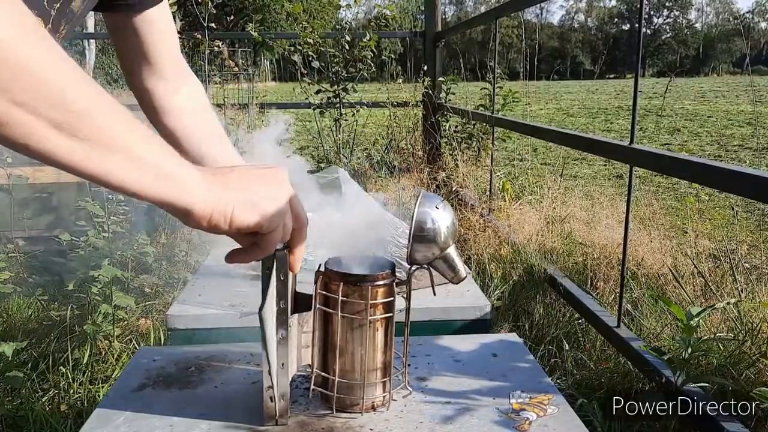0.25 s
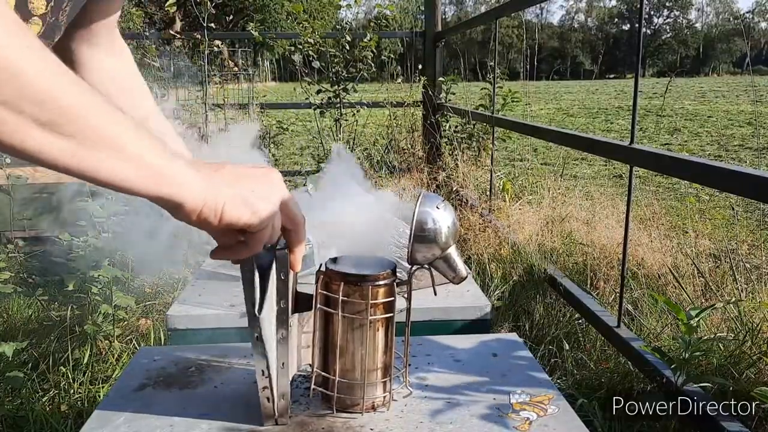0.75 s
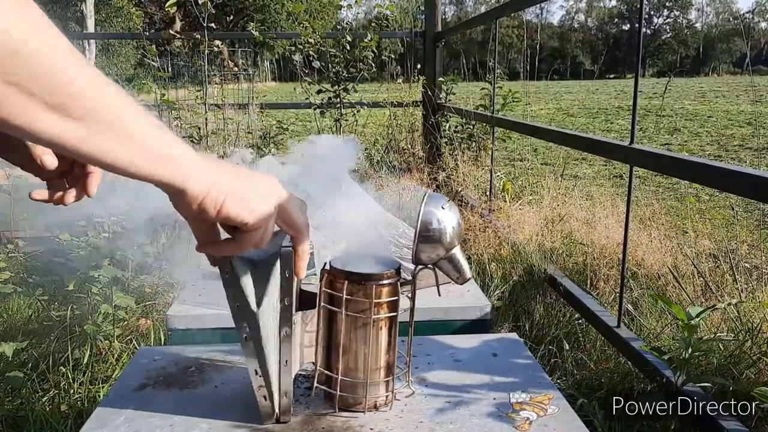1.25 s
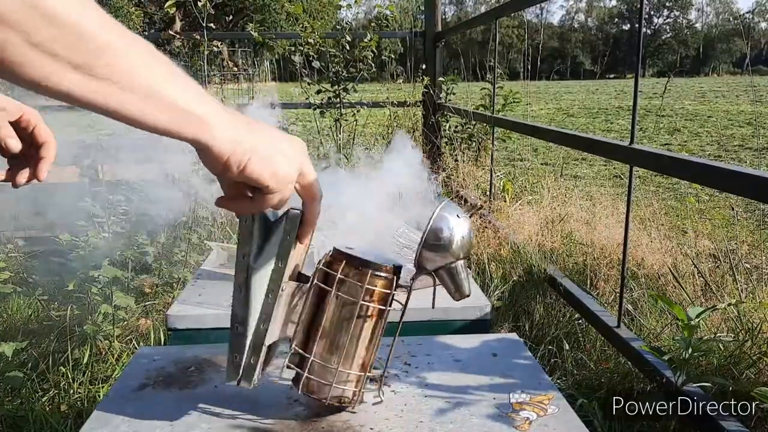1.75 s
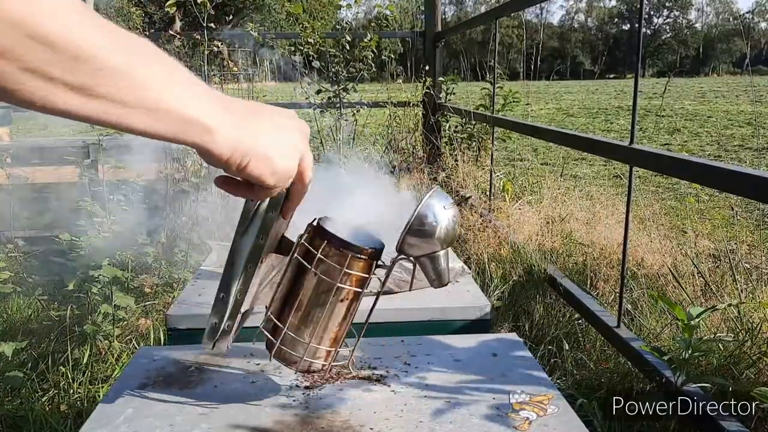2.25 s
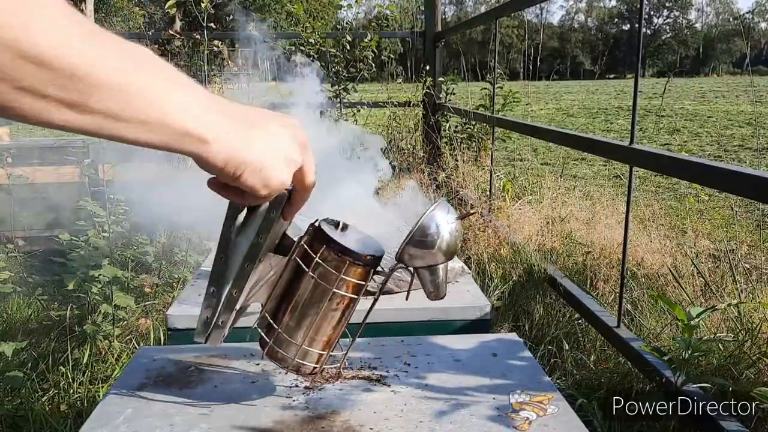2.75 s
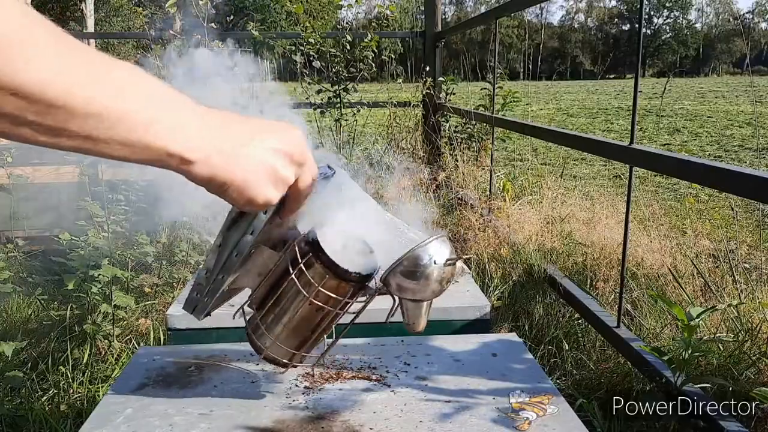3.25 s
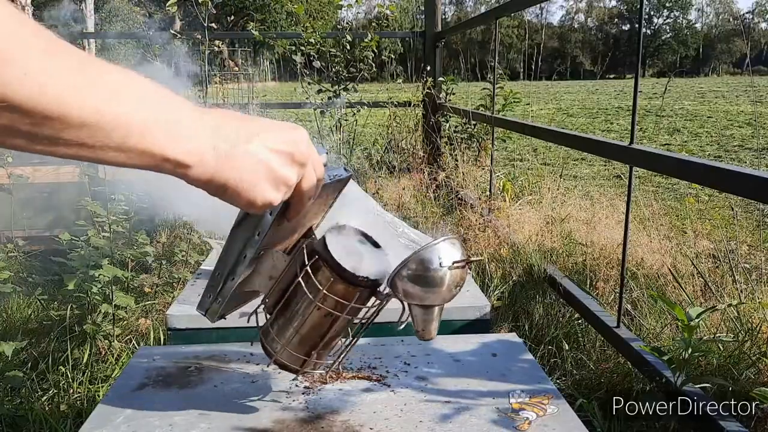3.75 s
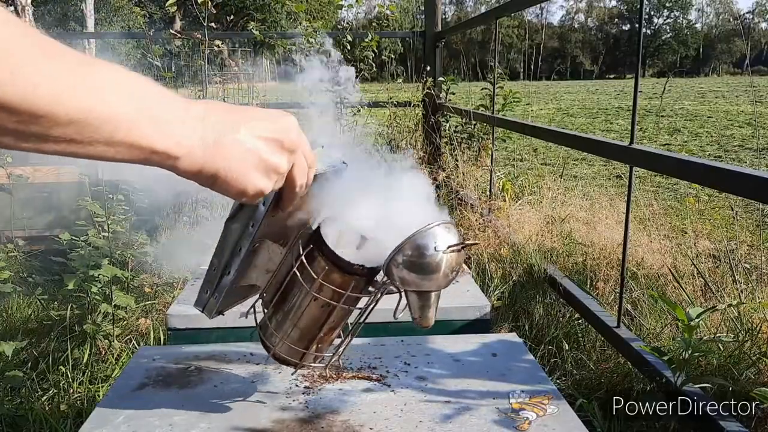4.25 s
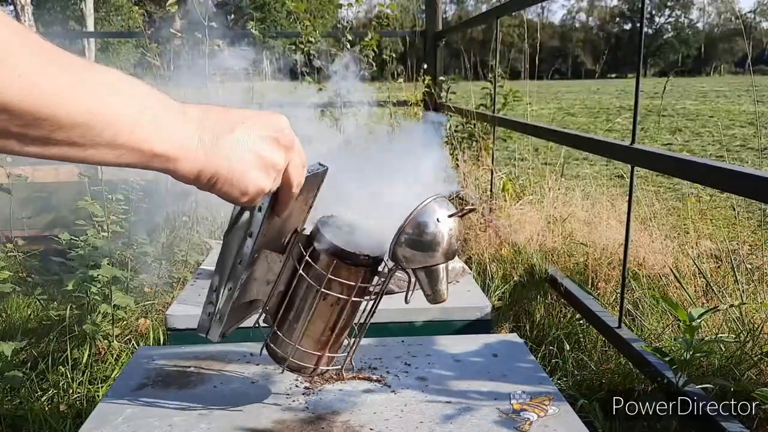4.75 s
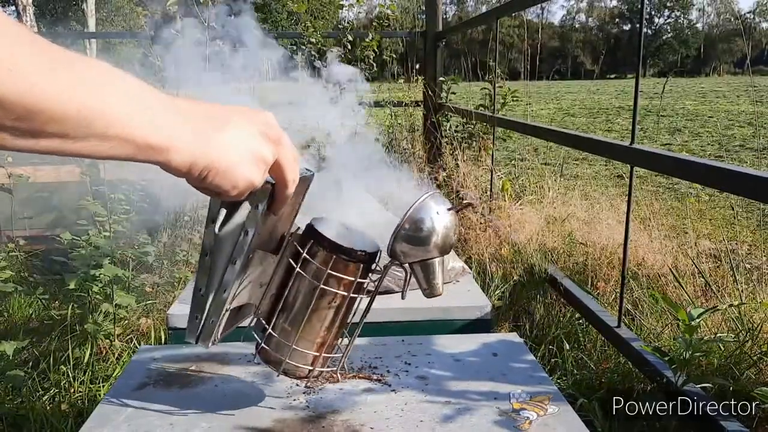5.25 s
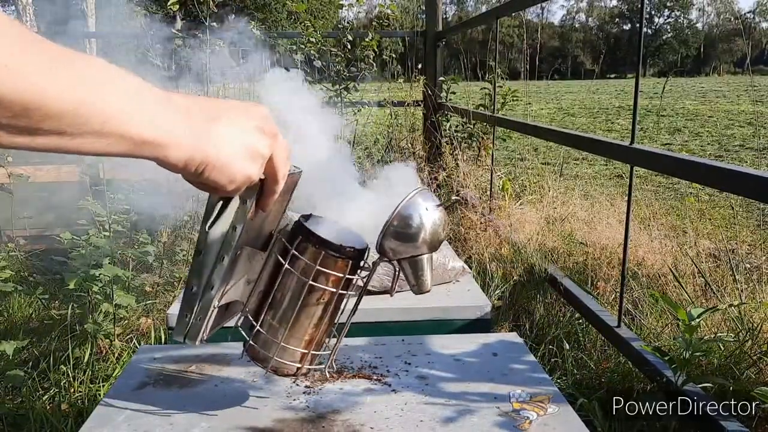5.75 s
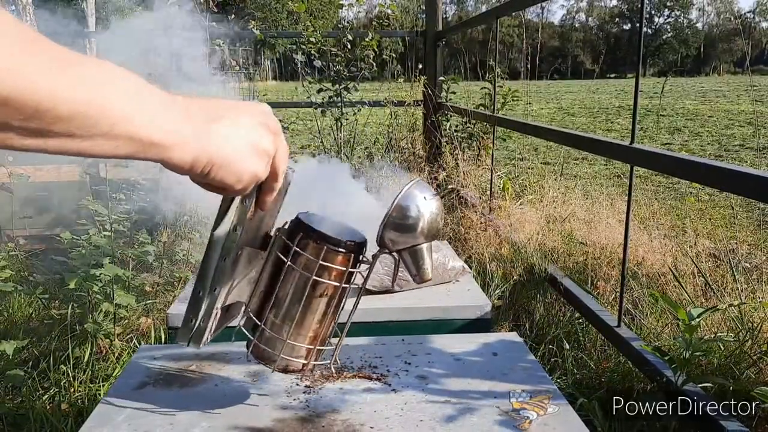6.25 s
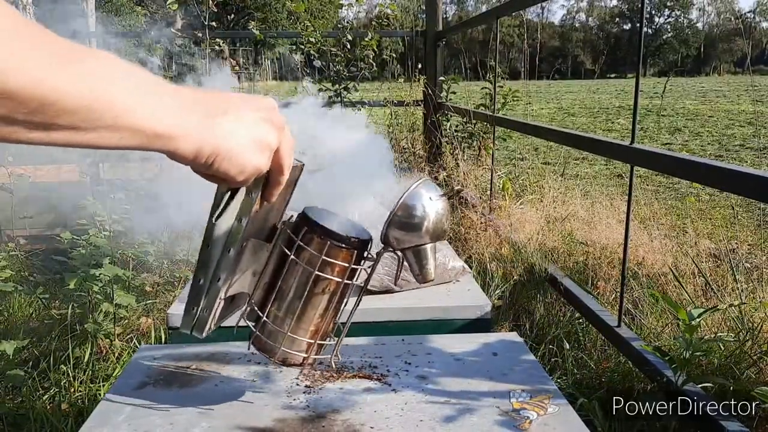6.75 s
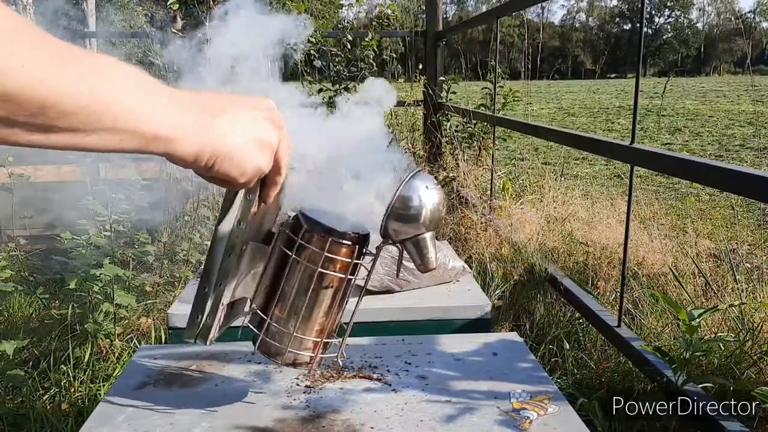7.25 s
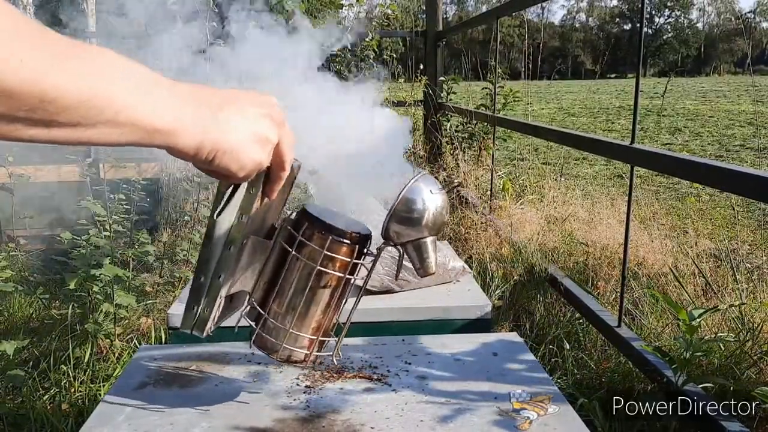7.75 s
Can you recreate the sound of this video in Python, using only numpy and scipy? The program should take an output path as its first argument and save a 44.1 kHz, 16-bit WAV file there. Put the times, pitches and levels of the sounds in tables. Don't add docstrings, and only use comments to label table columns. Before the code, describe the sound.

Outdoors in a meadow, a close stereo microphone catches short hollow whooshes from a bellows-driven tin smoker. Hand rustle on leather, crackling ticks and low wind thumps fill the slower opening; then brisk regular puffs carry thin high whistles, tiny squeaks and dull board knocks. A pause comes near five seconds before pumping resumes, while a distant, echo-blurred cockerel crows raspily.

```python
import sys
import numpy as np
from scipy import signal
from scipy.fft import rfft, irfft, next_fast_len
from scipy.io import wavfile
from scipy.ndimage import map_coordinates

SR = 44100
rng = np.random.default_rng(int(sys.argv[2]) if len(sys.argv) > 2 else 0)


def attenuation_scalar(level_db):
    decades = np.asarray(level_db, float) / 20
    return 10 ** decades


def wav_out(sig):
    wavfile.write(sys.argv[1], SR, np.round(np.clip(np.atleast_2d(sig).T, -1, 1) * 32767).astype(np.int16))


N = 352800

# (centre [Hz], width [Hz], level [dB])
CAN_MODES = [(173, 56, -26), (319, 61.4, -12), (451, 127, -4), (572, 96.3, 1), (835, 117, -12.5)]
# (centre [Hz], width [Hz], level [dB])
MOUTH_MODES = [(1045, 244, 5), (1440, 612, -2), (1967, 310, -4.5), (2740, 330, -39.5)]
# (frequency [Hz], correlation [-1..1])
NEAR_LIKENESS = [(300, .97), (900, .95), (1200, .85), (2000, .75), (2700, .6), (3700, .8), (6000, .42),
                 (14000, .22)]


def unit(x):
    return x / np.sqrt(np.mean(x ** 2) + 1e-20)


def along(points, hz):
    f, v = np.transpose(points)
    return np.interp(np.log(hz + 1), np.log(f + 1), v)


def curves(rows):
    s, *cols = np.transpose(rows)
    return [np.interp(np.arange(N) / SR, s, c) for c in cols]


def wobble(rate):
    knots = rng.standard_normal(int(N * rate / SR) + 4)
    return map_coordinates(knots, [np.arange(N) * rate / SR])


def filtered(x, response):
    m = next_fast_len(N + SR // 2)
    return irfft(rfft(x, m) * response(np.fft.rfftfreq(m, 1 / SR)), m)[..., :N]


def modes(table):
    def response(f):
        h = 0
        for k, (centre, width, db) in enumerate(table):
            drag = 1j * f * width
            h = h + (-1) ** k * attenuation_scalar(db) * drag / (centre * centre - f * f + drag)
        return h / np.sqrt(np.mean(abs(h) ** 2))
    return response


def rush(spectrum, alike):
    m = next_fast_len(N)
    hz = np.fft.rfftfreq(m, 1 / SR)
    turn = np.arccos(np.clip(along(alike, hz), -1, 1)) / 2
    a, b, c, d = rng.standard_normal((4, len(hz))) * attenuation_scalar(along(spectrum, hz))
    mid = np.cos(turn) * (a + 1j * b)
    side = np.sin(turn) * (c + 1j * d)
    return unit(irfft([mid + side, mid - side], m)[:, :N])


def pair(alike):
    return rush([(1, 0)], alike)


def add(track, s, sound):
    part = track[..., max(round(s * SR), 0):][..., :sound.shape[-1]]
    part += sound[..., :part.shape[-1]]


def swells(rows, rise, fall, quiet_db):
    t = np.arange(0, N / SR, 1 / 1000)
    s, hold, *levels = np.transpose(rows)[..., None]
    off_db = rise * np.clip(s - t, 0, None) + fall * np.clip(t - s - hold, 0, None)
    loudest = [np.maximum((db - off_db).max(axis=0), quiet_db) for db in levels]
    return curves(np.transpose([t, *loudest]))


def strokes():
    # (start [s], length [s], roar in the can [dB], jet hiss [dB], lateness of the fastest flow [exponent])
    pumps = [(-0.107, 0.15, -14, -38, 0.92), (0.22, 0.15, -21, -57.5, 0.98),
             (0.569, 0.18, -30.5, -81, 0.59), (0.972, 0.16, -24.5, -66.5, 1.075),
             (1.447, 0.3, -25.5, -57.5, 0.82), (1.831, 0.19, -29, -60.5, 0.94),
             (2.178, 0.21, -29, -57, 0.58), (2.501, 0.16, -26.5, -54.5, 0.87),
             (2.832, 0.14, -23.5, -55, 0.85), (3.145, 0.17, -28, -59, 0.71), (3.464, 0.16, -32, -64, 0.7),
             (3.752, 0.19, -28.5, -59, 0.87), (4.09, 0.17, -26, -59, 0.96), (4.437, 0.19, -29, -62, 0.71),
             (4.763, 0.14, -26.5, -53, 0.96), (5.466, 0.28, -29.5, -60.5, 0.78),
             (5.895, 0.19, -27.5, -57, 0.65), (6.233, 0.15, -29.5, -59, 0.93),
             (6.55, 0.18, -27.5, -57, 1.005), (6.901, 0.17, -27, -55, 0.81),
             (7.245, 0.16, -28, -57.5, 0.95), (7.571, 0.18, -28, -61, 0.98), (7.915, 0.16, -25, -59, 1.03)]
    roar_power, hiss_power, choke_db = 3.28, 4.1, -0.08
    t = np.arange(0, N / SR, 1 / 1000)
    s, length, roar_db, hiss_db, late = np.transpose(pumps)[..., None]
    flow = abs(np.sin(np.pi * np.clip((t - s) / length, 0, 1) ** late))
    flow_db = 20 * np.log10(flow + 1e-6)
    roar = roar_db + roar_power * np.minimum(flow_db - choke_db, 0) - 1.54
    hiss = hiss_db + hiss_power * flow_db
    return curves(np.transpose([t, *[np.maximum(db.max(axis=0), -100) for db in (roar, hiss)]]))


def bellows():
    # (time [s], level [dB])
    turns = [(0, -2.5), (.9, 18.5), (1.1, 2.5), (1.6, 8.5), (2, 2), (3, 0.5), (4.3, 0.5), (4.8, 3.5),
             (8, 2.5)]
    # (frequency [Hz], level [dB per Hz])
    jet = [(2000, -32), (3700, -5.5), (4700, -4), (6300, -4.5), (8300, -12), (9400, -24.5), (12500, -12.5),
           (15500, -23)]
    roar_db, hiss_db = strokes()
    facing_db, = curves(turns)
    lumps = 1.3 * wobble(55)
    can = filtered(attenuation_scalar(roar_db + lumps) * pair(NEAR_LIKENESS), modes(CAN_MODES))
    mouth_db = 0.79 * roar_db + 0.43 * hiss_db + 9 + facing_db
    mouth = filtered(attenuation_scalar(mouth_db + 0.47 * lumps) * pair(NEAR_LIKENESS), modes(MOUTH_MODES))
    hiss = attenuation_scalar(hiss_db + 6.5 + 0.48 * lumps) * rush(jet, NEAR_LIKENESS)
    return can + mouth + hiss


def bursts():
    # (time [s], peak [dB])
    eddies = [(0.0, -15.5), (0.268, -14), (0.285, -18), (0.325, -11), (0.605, -25), (1.018, -23),
              (1.032, -18), (1.501, -16.5), (1.53, -21), (1.611, -16), (1.903, -16), (1.936, -11),
              (2.231, -13), (2.547, -14), (2.873, -15), (2.893, -14), (3.187, -16.5), (3.212, -19),
              (3.518, -18.5), (3.799, -20), (3.861, -14.5), (4.163, -14.5), (4.181, -16), (4.197, -20),
              (4.493, -27), (4.803, -27), (5.516, -26.5), (5.933, -15), (6.278, -17), (6.304, -19),
              (6.931, -22), (6.965, -16), (7.292, -21), (7.611, -26), (7.96, -23)]
    push_hz, mouth_db = 1540, -10.5
    pushes = np.zeros(N)
    s, db = np.transpose(eddies)
    pushes[np.round(s * SR).astype(int)] = attenuation_scalar(db + 11.5)

    def ring(f):
        both = modes(CAN_MODES)(f) + attenuation_scalar(mouth_db) * modes(MOUTH_MODES)(f)
        return both / (1 + 1j * f / push_hz)
    return filtered(pushes, ring)


def refill():
    # (time [s], hold [s], creak of leather and fuel [dB], sucked air [dB])
    openings = [(0.0, 0.2, -51, -50.5), (.36, 0.27, -51, -56.5), (.72, 0.12, -58, -82),
                (1.17, 0.032, -50.5, -55), (1.7, 0.21, -61.5, -63), (2.08, 0.028, -60.5, -67.5),
                (2.68, 0.034, -59, -65.5), (2.98, 0.051, -52, -60.5), (3.12, 0.23, -59.5, -66.5),
                (3.66, 0.066, -58, -69.5), (3.95, 0.057, -56, -68), (4.27, 0.089, -58.5, -67.5),
                (4.63, 0.068, -56, -64.5), (4.92, 0.069, -59.5, -63.5), (5.7, 0.2, -60.5, -73),
                (6.07, 0.085, -57, -66), (6.39, 0.016, -57.5, -66), (6.75, 0.14, -61.5, -66.5),
                (7.08, 0.025, -61, -65), (7.42, 0.033, -52, -65), (7.75, 0.065, -59.5, -69)]
    # (time [s], hold [s], rustle [dB])
    brushes = [
        (0.0, 0.18, -50.5),
        (.2, 0.48, -54),
        (1.13, 0.12, -64),
        (3.0, 0.031, -79),
    ]
    # (frequency [Hz], level [dB per Hz])
    creaking = [(90, -21.5), (180, -22), (350, -1), (600, -5.5), (1300, -12), (1800, -20), (2600, -32),
                (5000, -42.5)]
    sucking = [(1500, -19), (3200, 4), (4500, 1.5), (6300, -0.5), (8300, -2.5), (9400, -18.5), (12500, -2),
               (15500, -14)]
    rustling = [(500, -4), (1300, 14), (2600, 8.5), (4500, 4.5), (9000, -22), (15500, -42)]
    creak_db, air_db = swells(openings, 83.5, 91, -100)
    hand_db, = swells(brushes, 123, 91, -100)
    grain = wobble(35)
    creak = attenuation_scalar(creak_db + 1.8 * grain + 2.5 * wobble(250)) * rush(creaking, NEAR_LIKENESS)
    hand = attenuation_scalar(hand_db - 1 + 3.5 * wobble(60) + 4 * wobble(450)) * rush(rustling, NEAR_LIKENESS)
    air = attenuation_scalar(air_db + 2 * grain + 1.6 * wobble(12)) * rush(sucking, NEAR_LIKENESS)
    return creak + hand + air


def wind():
    # (time [s], hold [s], buffet [dB])
    gusts = [(0.0, 0.022, -51), (.2, 0.071, -46), (.49, 0.11, -42), (.7, 0.011, -40.5), (1.07, 0.06, -39),
             (1.34, 0.018, -45), (1.45, 0.0064, -38.5), (1.55, 0.11, -49.5), (1.94, .03, -52.5),
             (2.29, 0.01, -59.5), (2.6, 0.028, -58), (2.92, 0.018, -55), (3.38, 0.04, -56),
             (3.88, 0.044, -57.5), (4.03, .02, -52.5), (4.14, 0.015, -46), (4.32, .01, -59),
             (4.48, 0.015, -52.5), (4.95, 0.04, -58.5), (5.84, 0.2, -53.5), (6.2, 0.16, -68),
             (6.6, .06, -68), (7.95, .05, -73)]
    # (frequency [Hz], level [dB per Hz])
    rumble = [(13, -24), (22, -19), (54, 11.5), (83, 7.5), (112, -1), (250, -21.5), (390, -60), (660, -120)]
    buffet_db, = swells(gusts, 220, 124, -75.5)
    lumps = attenuation_scalar(0.88 * np.array([wobble(14), wobble(14)]))
    port_db = [[.5], [4.5]]
    return attenuation_scalar(buffet_db + port_db) * unit(lumps * rush(rumble, [(30, 0.18)]))


def meadow():
    # (frequency [Hz], level [dB per Hz])
    hum = [(24, -19.5), (70, -4.5), (300, -10), (1500, -21), (3000, -35), (6500, -27), (10000, -42.5),
           (15000, -26)]
    # (frequency [Hz], correlation [-1..1])
    far_likeness = [(60, 1), (300, 0.59), (800, 0.09), (2000, 0.033), (15000, 0.036)]
    return attenuation_scalar(-60 + 1.1 * wobble(2.52)) * rush(hum, far_likeness)


def ticks():
    # (time [s], peak [dB], body [dB], treble [dB])
    clicks = [(0.086, -30.5, -10, 8), (0.1493, -35.5, -9, 2), (0.1693, -43, 10, -3), (0.246, -46, -12, 0),
              (0.362, -32, -15, 5), (0.4403, -28.5, -14, -6), (0.4675, -24, -10, 5.5), (0.556, -50, 4, -11),
              (0.582, -39, 5, -4), (0.671, -44, -14, -15), (0.6797, -31, -1, -11), (0.693, -31, -2, -18),
              (1.1557, -42, -20, 10), (1.219, -48, 11, -15), (1.272, -64, -20, 12), (1.3667, -66, -27, 14),
              (1.3924, -36.5, 6, -5), (1.413, -50, 9, -10), (2.71, -50, -6, 7), (3, -45, -15, 9),
              (3.0155, -49, 0, -10), (3.3023, -46, -20, -8), (3.8901, -40.5, -4, -23),
              (5.658, -45.5, -18, 0), (6.0702, -45, -3, 2), (6.4065, -50, 3, 3), (6.763, -60, -9, 14)]
    # (time [s], peak [dB], pitch [Hz])
    knocks = [
        (0.378, -29, 463),
        (2.727, -33, 404),
        (3.024, -22.5, 320),
        (3.362, -31, 492),
        (3.661, -31, 490),
        (3.988, -38, 404),
        (4.319, -38, 664),
        (4.353, -35.5, 590),
        (7.439, -48, 500),
    ]
    # (frequency [Hz], level [dB per Hz])
    dull = [(300, 8), (1500, 10), (4000, 8.5), (7000, 3.5), (9000, -43)]
    bright = [(5000, -20), (8000, -2), (12000, -3), (15500, 3.5)]
    ring_hz, ring_spread, crack_t60_s = 1380, .015, 0.012
    cracks, rings, t = np.zeros((2, N)), np.zeros(N), np.arange(SR // 20) / SR
    for s, db, body_db, treble_db in clicks:
        hz = ring_hz * np.exp(ring_spread * rng.standard_normal())
        crack_db = [[db], [db + treble_db - 6]] - 60 * t / crack_t60_s
        add(cracks, s, attenuation_scalar(crack_db) * (1 - np.exp(-t / 0.00015)))
        ring = attenuation_scalar(db + body_db - 2.0 - 60 * t / 0.024) * (1 - np.exp(-t / 0.00063))
        add(rings, s, ring * np.sin(2 * np.pi * hz * t))
    for s, db, hz in knocks:
        ring = attenuation_scalar(db + 5.0 - 60 * t / 0.017) * (1 - np.exp(-t / 0.0041))
        add(rings, s, ring * np.sin(2 * np.pi * hz * t))
    low, high = cracks * attenuation_scalar(.8 * wobble(500))
    return low * rush(dull, NEAR_LIKENESS) + high * rush(bright, NEAR_LIKENESS) + rings


def whistle():
    # (time of fastest flow [s], rise [s], fall [s], top pitch [Hz], level [dB])
    tones = [(0.286, 0.024, 0.087, 8840, -69.5), (1.043, 0.025, 0.032, 7900, -56.5),
             (1.562, 0.046, 0.064, 8700, -55), (1.912, 0.025, 0.034, 7980, -50.5),
             (2.234, 0.018, 0.034, 8830, -56.5), (2.567, 0.028, 0.019, 9280, -57),
             (2.887, 0.02, 0.015, 9960, -60), (3.2, 0.018, 0.028, 8570, -55.5),
             (3.828, 0.023, 0.041, 8440, -57.5), (4.163, 0.027, 0.032, 8570, -53),
             (5.563, 0.03, 0.06, 7850, -56), (5.957, 0.018, 0.049, 8600, -57.5),
             (6.296, 0.015, 0.023, 8100, -70), (6.633, 0.019, 0.033, 9000, -54.5),
             (6.964, 0.028, 0.057, 9000, -65), (7.313, 0.022, 0.035, 9000, -57.5),
             (7.653, 0.021, 0.03, 8350, -55.5), (7.983, 0.017, 0.021, 8680, -48.5)]
    out = np.zeros(N)
    for s, rise, fall, top_hz, db in tones:
        t = np.arange(-1.2 * rise, 1.5 * fall, 1 / SR)
        u = t / np.where(t < 0, rise, fall)
        hz = top_hz * (1 - .18 * abs(u) ** 1.8) + 550 * rng.standard_normal(len(t))
        fade = np.clip(np.minimum(3 * (u + 1.2), 2.2 * (1.5 - u)), 0, 1)
        add(out, s + t[0], attenuation_scalar(db - 1.0) * fade * np.sin(2 * np.pi * np.cumsum(hz) / SR))
    return out * attenuation_scalar(4 * wobble(75) - 1) * (1 + .4 * wobble(700))


def squeaks():
    # (time [s], pitch [Hz], level [dB])
    chirps = [
        (2.06, 6670, -67),
        (2.099, 5960, -62),
        (3.034, 7000, -63),
        (3.696, 5650, -62),
        (4.015, 7440, -66),
        (4.375, 6040, -64),
        (5.85, 4900, -66),
    ]
    length_s, sinking = .035, .08
    out, u = np.zeros(N), np.linspace(0, 1, round(length_s * SR))
    for s, hz, db in chirps:
        pitch = hz * (1 - sinking * u) + 900 * rng.standard_normal(len(u))
        add(out, s, attenuation_scalar(db) * np.sin(np.pi * u) * np.sin(2 * np.pi * np.cumsum(pitch) / SR))
    return out


def cockerel():
    # (start [s], length [s], pitch [Hz], level [dB], hoarseness [ratio])
    syllables = [(3.66, .14, 860, -60, 4), (3.9, .22, 538, -59, 6), (4.22, .27, 500, -61, 14),
                 (5.41, .14, 540, -64, 9), (5.55, .25, 715, -65, 5), (6.0, .25, 595, -58, 5),
                 (6.39, .23, 568, -54.5, 5), (6.68, .14, 555, -66, 6), (6.86, .09, 628, -60, 1.5),
                 (7.02, .24, 554, -60, 1.6), (7.385, .24, 548, -52.5, .8), (7.41, .22, 876, -63, 2.5),
                 (7.7, .2, 551, -63, 2.5)]
    beak = [2, 4, 3, 3, 2, 4, 4, 2, 2, 2, 2, 2, 2]
    # (frequency [Hz], level [dB])
    throat = [(400, -18), (780, -4), (950, -7), (1130, 0), (1600, -11), (2000, -17), (2400, -17),
              (2900, -32)]
    voice = np.zeros(N)
    for (start, length, pitch_hz, db, hoarse), overtone in zip(syllables, beak):
        n = int(length * SR)
        u, m = np.linspace(0, 1, n), next_fast_len(n)
        jitter = np.interp(u * length * 150, np.arange(80), rng.standard_normal(80))
        drift = np.interp(u * length * 20, np.arange(9), rng.standard_normal(9))
        arch = -.045 * (u - .4) ** 2 + .02 * (.5 - u)
        hz = pitch_hz * (1 + .013 * jitter + .012 * drift + arch)
        phase = 2 * np.pi * np.cumsum(hz) / SR
        tone = sum(np.sin(k * phase) for k in range(1, 6))
        breath = hoarse * (1 + np.cos(phase)) * rng.standard_normal(n)
        f = np.fft.rfftfreq(m, 1 / SR)
        favoured = 1 + 2.0 * np.exp(-((f - overtone * pitch_hz) / 130) ** 2)
        colour = attenuation_scalar(along(throat, f)) * favoured
        swell = np.clip(6 * np.minimum(u, .5 * (1 - u)), 0, 1)
        add(voice, start, attenuation_scalar(db) * swell * unit(irfft(rfft(tone + breath, m) * colour, m)[:n]))
    voice = voice * attenuation_scalar(2 * wobble(35))
    t = np.arange(SR // 2) / SR
    echoes = rng.standard_normal((2, len(t))) * attenuation_scalar(-60 * t / 0.2)
    echoes = echoes / np.linalg.norm(echoes[0])
    return voice + attenuation_scalar(-2) * signal.fftconvolve(voice[None], echoes, axes=1)[:, :N]


def scene():
    # (frequency [Hz], phase [rad])
    twist = [(300, 0), (500, -.4), (1000, -.35), (1300, 0), (2400, -.75), (3400, 0.1), (8000, 1)]
    lag_s = 1.3e-4
    near = bellows() + bursts() + refill() + ticks() + whistle() + squeaks()

    def late(hz):
        return np.exp(1j * (np.pi * hz * lag_s + along(twist, hz) / 2) * np.array([[1], [-1]]))
    return filtered(near, late) + wind() + meadow() + cockerel()


def top_cut(x):
    return signal.sosfilt(signal.butter(12, 16490, fs=SR, output="sos"), x)


def record(dry):
    # (frequency [Hz], left over right [dB])
    ports = [(150, 0), (400, 5.5), (600, 2), (1900, 3.5), (7300, -1), (8600, 14), (11500, 12), (15000, 1)]
    top_hz = 15830

    def colour(hz):
        return attenuation_scalar(along(ports, hz) * np.array([[.5], [-.5]])) * (hz < top_hz)
    mix = filtered(dry, colour)
    return top_cut(mix)


dry = scene()
out = record(dry)
wav_out(out)
```